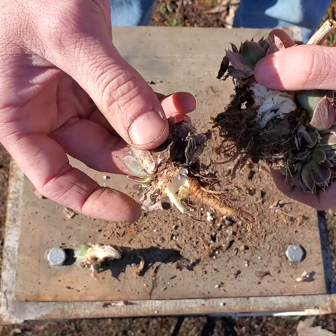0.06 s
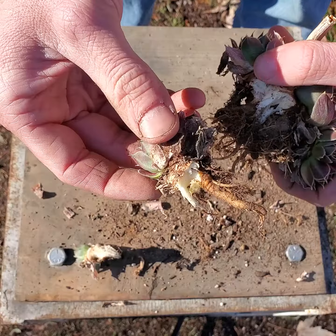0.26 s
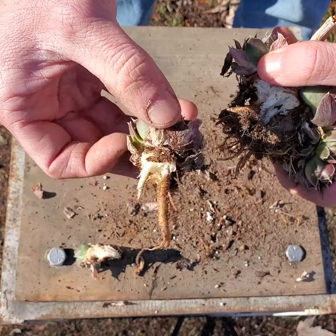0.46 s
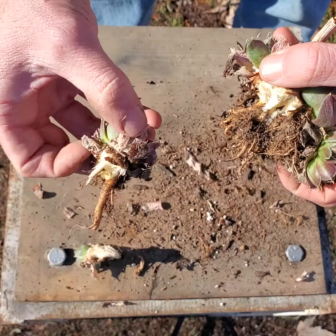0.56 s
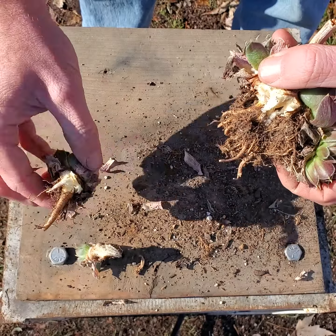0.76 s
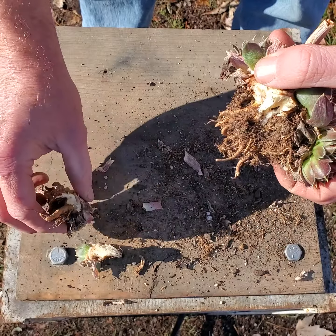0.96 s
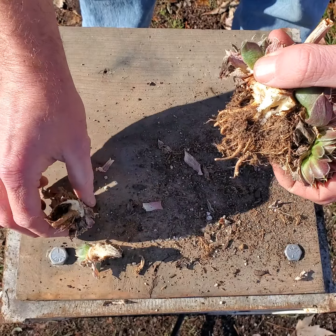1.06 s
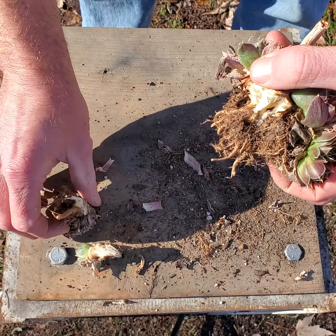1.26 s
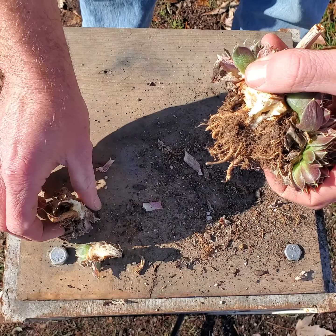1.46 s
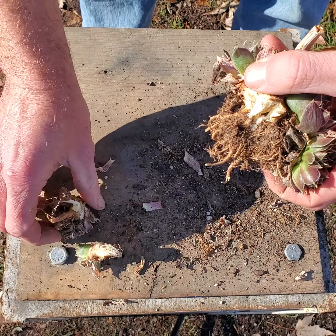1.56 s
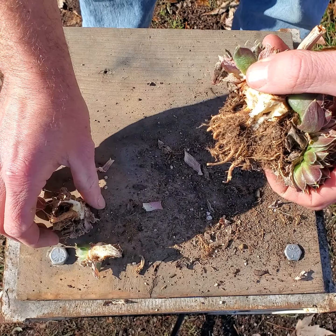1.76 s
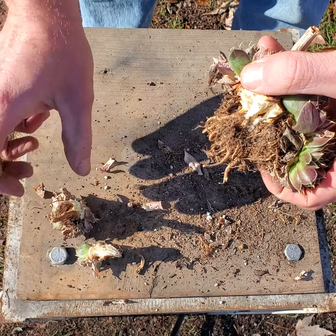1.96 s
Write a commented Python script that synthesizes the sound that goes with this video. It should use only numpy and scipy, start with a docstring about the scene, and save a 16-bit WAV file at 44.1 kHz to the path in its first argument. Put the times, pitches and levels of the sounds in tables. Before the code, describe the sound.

Soft crackling and tearing come from a plant being split by hand outdoors, near the left microphone. Roots snap, soil crumbles down, then the freed piece is set lightly on a board, with a low hum and distant rumble underneath.

```python
"""Faint crackle, then dry leaves rustling: a hand pulls a clump of fleshy plants apart, outdoors,
close to the left microphone. The roots tear in a run of tiny fractures, soil trickles, and the
freed piece is pressed down on a board, which rings briefly. Single fibres snap on top;
a low hum and a distant rumble lie underneath."""
import sys
import numpy as np
from scipy import signal
from scipy.fft import rfft, irfft
from scipy.io import wavfile
from scipy.ndimage import uniform_filter1d, map_coordinates

SR = 44100
rng = np.random.default_rng(int(sys.argv[2]) if len(sys.argv) > 2 else 0)


def master_out(mix):
    """Clip the mix to full scale and print it as 16-bit PCM to the path in sys.argv[1]."""
    frames = np.transpose(np.atleast_2d(mix))
    ceiling = np.clip(frames, -1, 1)
    pcm = np.round(ceiling * 32767).astype(np.int16)
    wavfile.write(sys.argv[1], SR, pcm)


N = 88200
T = np.arange(N) / SR

# rumble spectrum, and its side re mid (frequency [Hz], gain [dB])
RUMBLE_SPECTRUM = [(15, -36.5), (38, -6.5), (62, 2), (100, -2), (135, -11), (170, -10.5), (225, -19),
                   (290, -16.5), (390, -26.5), (650, -33.5), (1300, -37), (2500, -44), (5000, -52.5),
                   (9000, -57.5), (14000, -51)]
RUMBLE_SIDE = [(30, -7.5), (80, -13), (160, -9.5), (330, -5), (700, 0.5), (14000, 1)]
# slow swell of the rumble (time [s], gain [dB])
RUMBLE_SWELL = [(0, 0.5), (.2, -1.5), (.4, 0), (.58, 5), (.75, -0.5), (1.15, 0), (1.37, 2), (1.7, -2.5),
                (2.0, -1.5)]
# weight of the swell per register (frequency [Hz], gain [dB])
SWELL_WEIGHT = [(330, 0), (700, -4.5), (2000, 3.5)]
# rumble filters (frequency [Hz], gain [dB])
LEFT_TILT, RIGHT_TILT = [(500, 0), (1500, 2.5)], [(500, 0), (1500, -2.5)]
LOW_MIDS = [(90, -40), (140, 0), (500, 0), (900, -40)]
# hum envelope (time [s], level [dB])
HUM_LEVEL = [(0, -76.5), (.38, -77.5), (.45, -49), (.55, -57), (.64, -47.5), (.71, -80), (.8, -54),
             (1.0, -63), (1.075, -45), (1.14, -67), (1.3, -70), (1.43, -55), (1.6, -55.5), (1.68, -62),
             (2.0, -61.5)]
# piece knocking on the board (time [s], level [dB])
BOARD_KNOCKS = [(1.326, -51.5), (1.335, -58)]
# board modes (frequency [Hz], gain [dB], decay [s])
BOARD_MODES = [(253, 1, 0.0068), (930, -2, 0.0054), (1040, -6, 0.0035), (1460, -10, 0.004)]
# soft contacts (time [s], scuff [dB], centre [Hz], width [Hz], length [s], thud [dB])
CONTACTS = [(0.435, -55, 1720, 570, 0.0071, -58), (.447, -50.5, 2900, 1500, 0.0057, -77),
            (.459, -55, 3100, 1690, 0.0033, -75), (0.478, -70.5, 1340, 129, .035, -96),
            (.489, -55.5, 2170, 700, 0.028, -89), (.603, -67.5, 2330, 160, 0.025, -75),
            (.606, -42, 9000, 396, 0.007, -85), (0.736, -60, 4700, 1200, 0.0039, -82),
            (1.108, -60, 2740, 330, 0.0094, -74), (1.322, -64, 1130, 885, 0.023, -67),
            (1.337, -46, 5940, 2410, 0.0019, -48.5), (1.373, -65, 3340, 1900, 0.021, -72)]
# snapping fibres and dry leaves (time [s], body [dB], treble [dB], top [dB])
FIBRE_SNAPS = [(0.0273, -76, -58, -46), (0.1394, -73.5, -57, -76), (0.1672, -95, -39, -43),
               (0.1912, -90, -57, -48), (0.1975, -92, -58, -52), (0.2373, -92, -49, -39.5),
               (0.246, -86, -47, -39.5), (0.395, -63, -44.5, -46.5), (0.418, -71, -40.5, -43),
               (.4250, -62, -42, -46), (0.4361, -47, -36, -36), (0.437, -51, -41, -42),
               (.4410, -49, -48, -39), (0.4483, -51, -43, -37), (0.4603, -43, -33, -20.5),
               (0.4733, -46, -47, -37), (0.5007, -59, -39, -31), (0.5177, -48, -51, -50),
               (0.538, -56, -64, -38.5), (0.573, -55, -57, -39), (0.5796, -53, -43, -35.5),
               (.6100, -55, -40.5, -36), (0.6122, -70, -39, -28.5), (0.6344, -64, -52, -39.5),
               (0.6580, -61, -44, -48), (0.662, -61, -47, -44), (0.7085, -62, -52.5, -70),
               (0.7558, -60, -44, -46), (0.7692, -63, -45.5, -63), (0.8708, -89, -48, -44.5),
               (0.8905, -74, -46.5, -62), (0.95, -65, -55, -47), (0.955, -60.5, -48.5, -53),
               (1.1132, -57.5, -44, -45.5), (1.1452, -62, -64, -53), (1.1867, -65, -52, -39),
               (1.303, -85, -53.5, -41.5), (1.3537, -64.5, -71, -59), (1.3703, -49.5, -41, -60),
               (1.3767, -51, -49.5, -63), (1.385, -81, -63, -43), (1.4115, -65, -71, -58),
               (1.4223, -58, -52, -59), (1.4860, -60, -48, -46), (1.502, -67, -50, -42),
               (1.5105, -68, -57, -47), (1.969, -71, -60.5, -53)]
# body, treble and top bands of a snap (low [Hz], high [Hz])
SNAP_BANDS_HZ = [(1900, 5860), (6400, 16000), (11800, 14400)]
# crackle envelope per action (time [s], relative level [dB])
GRIP_EFFORT = [(0, -64), (.05, -65.5), (.11, -70), (.175, -65)]
PULL_EFFORT = [(.175, -71), (.215, -51), (.24, -46.5), (.255, -51.5), (.29, -72.5), (.32, -70), (.39, -79)]
TEAR_EFFORT = [(.39, -59), (.415, -43.5), (.438, -40.5), (.451, -32.5), (.476, -39), (.5, -31.5),
               (.515, -36.5), (.538, -43.5), (.555, -50)]
LAST_ROOTS_EFFORT = [(.555, -57.5), (.582, -50.5), (.597, -40), (.611, -40), (.622, -49.5), (.648, -63),
                     (.663, -53), (.68, -60), (.745, -75.5)]
TRICKLE_EFFORT = [(.745, -62), (.76, -56), (.79, -57.5), (.875, -50), (.925, -57), (1.0, -64), (1.08, -66),
                  (1.115, -60.5), (1.17, -64), (1.22, -71.5)]
SET_DOWN_EFFORT = [(1.22, -61), (1.245, -54), (1.285, -61), (1.34, -59), (1.385, -58.5), (1.44, -57.5),
                   (1.472, -67.5), (1.498, -58), (1.53, -62), (1.565, -62.5), (1.585, -75), (1.65, -77)]
HOLD_EFFORT = [(1.6, -78), (1.67, -75), (1.75, -84), (1.83, -93), (1.9, -71), (1.95, -83)]
LET_GO_EFFORT = [(1.955, -61), (1.968, -59.5), (2.0, -60)]
# crackle spectrum per material (frequency [Hz], gain [dB])
SOIL_SPECTRUM = [(900, -25), (1800, -44), (2800, -61), (3700, -22), (4400, -11.5), (5200, -18.5),
                 (6400, -5), (7700, -13), (9200, -8.5), (11000, -7), (14000, 0.5)]
LEAF_SPECTRUM = [(700, -62), (1350, -3.5), (1900, -64), (2650, -70), (3100, -17), (3900, -28), (4700, -12),
                 (6400, -7.5), (7700, -13.5), (9000, -10), (11500, -3.5), (14500, 0.5)]
ROOT_SPECTRUM = [(1000, -49.5), (1500, -44), (1900, -14.5), (2700, -18.5), (4000, -4.5), (5000, -25),
                 (5800, -8), (6900, -7), (7700, -20), (9200, -3), (10000, -4), (11400, 0), (12600, -3),
                 (13400, 7), (14500, -1)]
THIN_ROOT_SPECTRUM = [(1300, -47), (2200, -17), (3000, -19.5), (3900, -9.5), (5000, -15), (6900, -9.5),
                      (7700, -21), (9200, -7.5), (9900, -6.5), (11800, -5), (13000, -5), (14500, 0)]
LEAF_ON_BOARD_SPECTRUM = [(500, -19), (1200, -5), (2100, -20.5), (4300, -5.5), (5300, -17), (6400, -3),
                          (8200, -13), (9200, -6.5), (11000, -3.5), (14000, 2)]
FINGER_SPECTRUM = [(900, -28), (1500, -4), (2600, 3.5), (4200, -6), (5400, -22.5), (6400, -1.5),
                   (7300, -29), (14000, -11)]
CRACKLE_EDGES_HZ = [500, 2500, 5000, 8000, 11500, 16000]
# paths to the right microphone and off the hand (frequency [Hz], gain [dB])
FAR_PATH = [(500, -5.5), (1300, -24.5), (2400, -27), (4400, -28.5), (8000, -37), (15000, -37)]
HAND_PATH = [(4000, -2.0), (7000, -2.5), (12000, -9.0)]


def amp(db):
    return 10 ** (np.asarray(db) / 20)


def unit_rms(x):
    return x / np.sqrt(np.mean(x ** 2) + 1e-30)


def colour(x, points):
    """Filter by (frequency [Hz], gain [dB]) points."""
    hz, db = np.array(points, float).T
    bins_hz = np.maximum(np.fft.rfftfreq(N, 1 / SR), 1)
    return irfft(rfft(x) * amp(np.interp(np.log(bins_hz), np.log(hz), db)), N)


def band(x, lo_hz, hi_hz, order=2):
    """Causal band-pass."""
    edges_hz = np.clip([lo_hz, max(hi_hz, lo_hz + 10)], 10, SR / 2 - 10)
    return signal.sosfilt(signal.butter(order, edges_hz, "band", fs=SR, output="sos"), x)


def wander(per_s):
    """Smooth random curve, rms 1."""
    hold = max(int(SR / per_s), 1)
    steps = np.repeat(rng.standard_normal(N // hold + 1), hold)
    return unit_rms(uniform_filter1d(uniform_filter1d(steps, hold), hold)[:N])


def add(out, start_s, sound):
    i = int(np.clip(start_s * SR, 0, N - 1))
    out[i:i + len(sound)] += sound[:N - i]


def rumble(gain_db=-56.5):
    """Distant stereo rumble, slowly swelling; its hiss is stronger on the left."""
    swell = amp(np.interp(T, *np.array(RUMBLE_SWELL).T))
    mid, side = (unit_rms(colour(rng.standard_normal(N), RUMBLE_SPECTRUM)) for _ in range(2))
    side = colour(side, RUMBLE_SIDE)
    left, right = (ear + (swell - 1) * colour(ear, SWELL_WEIGHT) for ear in (mid + side, mid - side))
    return amp(gain_db) * np.array([colour(left, LEFT_TILT), colour(right, RIGHT_TILT)])


def flutter(ears, depth_db=1.75):
    """The low mids come and go quickly."""
    change = unit_rms(amp(depth_db * wander(per_s=22))) - 1
    return ears + change * np.array([colour(ear, LOW_MIDS) for ear in ears])


def hum(pitch_hz=76.68, octave_db=-18):
    """Low wavering tone with a weak octave."""
    phase = 2 * np.pi * np.cumsum(pitch_hz * (1 + 0.027 * wander(per_s=12.11))) / SR
    tone = unit_rms(np.sin(phase) + amp(octave_db) * np.sin(2 * phase))
    return tone * amp(np.interp(T, *np.array(HUM_LEVEL).T) + wander(per_s=13))


def knocks():
    """The piece touches down; the board's modes ring briefly."""
    out, age_s = np.zeros(N), T[:N // 20]
    ring = sum(amp(db) * np.sin(2 * np.pi * hz * age_s) * np.exp(-age_s / decay_s)
               for hz, db, decay_s in BOARD_MODES)
    for start_s, db in BOARD_KNOCKS:
        add(out, start_s, amp(db) * ring)
    return out


def bumps(thud_hz=257):
    """Soft contacts: a short scuff and a dull thud."""
    out, age_s = np.zeros(N), T[:N // 20]
    for start_s, scuff_db, hz, width_hz, length_s, thud_db in CONTACTS:
        noise = band(rng.standard_normal(len(age_s)), hz - width_hz / 2, hz + width_hz / 2)
        scuff = amp(scuff_db) * unit_rms(noise)
        thud = amp(thud_db) * np.sin(2 * np.pi * thud_hz * age_s)
        progress = 2 * age_s / length_s  # 1 at the peak
        add(out, start_s, (scuff + thud) * progress * np.exp(1 - progress))
    return out


def snaps(lead_s=0.003, rise_s=0.00024, decay_s=0.00024, tail_s=0.0028, tail_db=-14.5):
    """A fibre gives way: the crack runs up, breaks through and dies fast, with a faint tail."""
    out, age_s = np.zeros(N), T[:N // 100] - lead_s
    before_s, after_s = np.maximum(-age_s, 0), np.maximum(age_s, 0)
    fall = np.exp(-after_s / decay_s) + amp(tail_db) * np.exp(-after_s / tail_s)
    envelope = np.exp(-before_s / rise_s) * fall
    for break_s, *levels_db in FIBRE_SNAPS:
        for (lo_hz, hi_hz), db in zip(SNAP_BANDS_HZ, levels_db):
            burst = band(envelope * rng.standard_normal(len(age_s)), lo_hz, hi_hz, order=7)
            burst *= np.sqrt(100 / np.sum(burst ** 2))  # energy of 100 samples at rms 1
            add(out, break_s - lead_s, amp(db) * burst)
    return out


def fracture(rise_s=0.0001, decay_s=0.00095, tail_s=0.0031, tail_db=-17):
    """Envelope of one fracture: quick rise, quick fall, faint tail."""
    age_s = T[:N // 100]
    fall = np.exp(-age_s / decay_s) + amp(tail_db) * np.exp(-age_s / tail_s)
    return (1 - np.exp(-age_s / rise_s)) ** 2 * fall


def bend(x, drift_share=0.035):
    """The resonances of the flesh shift together as it bends."""
    read_index = np.cumsum(1 + drift_share * wander(per_s=25))
    return map_coordinates(x, [read_index], order=5, mode="mirror")


def crackle(effort, spectrum, per_s, gain_db, size_spread_db=4.5, band_spread_db=3.3):
    """Tiny fractures at random moments, each with its own size and colour; effort sets the level."""
    hits = rng.random(N) < per_s / SR
    size_db = size_spread_db * np.clip(rng.standard_normal(N), -2, 2)
    grain = fracture()
    grains = np.zeros(N)
    for lo_hz, hi_hz in zip(CRACKLE_EDGES_HZ, CRACKLE_EDGES_HZ[1:]):
        sizes = amp(size_db + band_spread_db * rng.standard_normal(N))
        energy = np.abs(signal.fftconvolve(hits * sizes ** 2, grain ** 2)[:N])
        energy /= np.maximum(uniform_filter1d(energy, size=900), 1e-9)  # levelled over 20 ms
        grains += band(np.sqrt(energy) * rng.standard_normal(N), lo_hz, hi_hz, order=3)
    texture = unit_rms(bend(colour(grains, spectrum)))
    times_s, effort_db = np.array(effort).T
    gate = uniform_filter1d(1. * ((T >= times_s[0]) & (T <= times_s[-1])), size=200)
    return texture * amp(np.interp(T, times_s, effort_db) + gain_db) * gate


def plant():
    """All the handling, from first grip to letting go."""
    return (crackle(GRIP_EFFORT, SOIL_SPECTRUM, per_s=690, gain_db=0)
            + crackle(PULL_EFFORT, LEAF_SPECTRUM, per_s=1800, gain_db=1.5)
            + crackle(TEAR_EFFORT, ROOT_SPECTRUM, per_s=2400, gain_db=-3)
            + crackle(LAST_ROOTS_EFFORT, THIN_ROOT_SPECTRUM, per_s=2800, gain_db=2.5)
            + crackle(TRICKLE_EFFORT, SOIL_SPECTRUM, per_s=1500, gain_db=2.5)
            + crackle(SET_DOWN_EFFORT, LEAF_ON_BOARD_SPECTRUM, per_s=1500, gain_db=1)
            + crackle(HOLD_EFFORT, FINGER_SPECTRUM, per_s=1300, gain_db=-4)
            + crackle(LET_GO_EFFORT, SOIL_SPECTRUM, per_s=1400, gain_db=-2.5)
            + snaps() + bumps() + knocks())


def hand_reflection(x, mean_delay_s=0.0022, wander_share=0.16, gain_db=-6):
    """Dull echo off the moving hand; added to the direct sound it makes shifting ripples."""
    delay_s = mean_delay_s * (1 + wander_share * wander(per_s=7))
    return amp(gain_db) * map_coordinates(colour(x, HAND_PATH), [(T - delay_s) * SR], order=3)


def scatter(x, decay_s=0.0019):
    """Weak, dull scattered paths to the far microphone."""
    paths = rng.standard_normal(N // 100) * np.exp(-T[:N // 100] / decay_s)
    paths /= np.sqrt(np.sum(paths ** 2))
    return colour(signal.fftconvolve(x, paths)[:N], FAR_PATH)


def scene():
    """Plant direct on the left, scattered on the right; rumble and hum in both."""
    direct = plant()
    left = direct + hand_reflection(direct)
    return np.array([left, scatter(left)]) + flutter(rumble()) + hum()


def record(dry):
    """Steep low-pass."""
    cutoff_hz = 14650
    return signal.sosfilt(signal.ellip(10, .3, 60, cutoff_hz, fs=SR, output="sos"), dry)


dry = scene()
out = record(dry)
master_out(out)
```